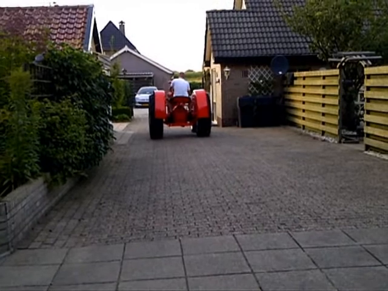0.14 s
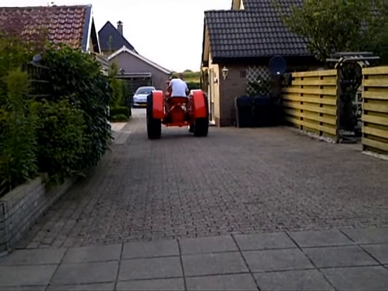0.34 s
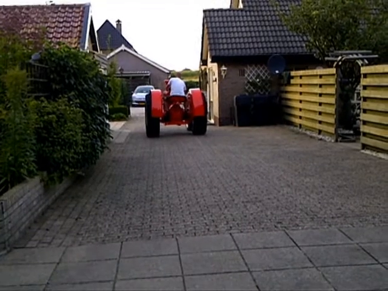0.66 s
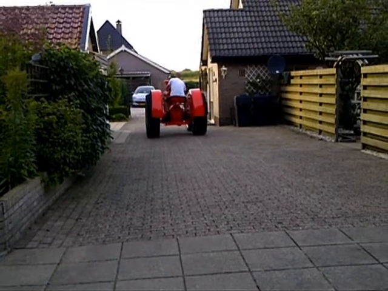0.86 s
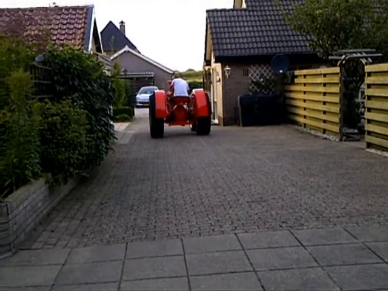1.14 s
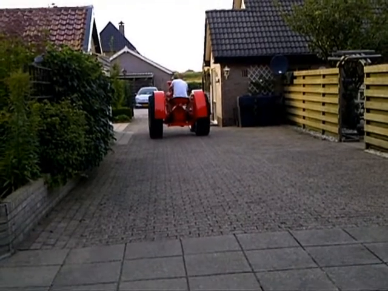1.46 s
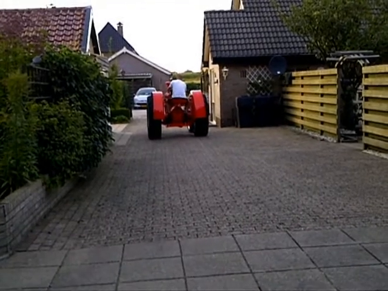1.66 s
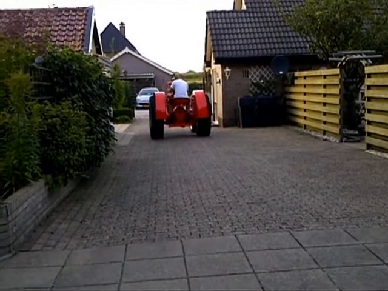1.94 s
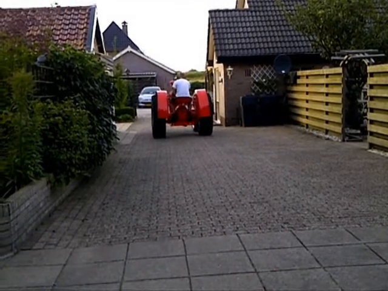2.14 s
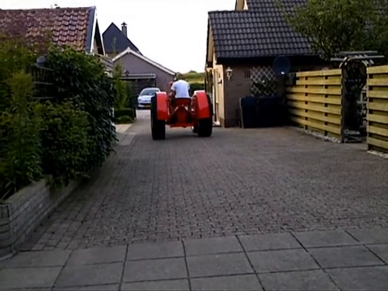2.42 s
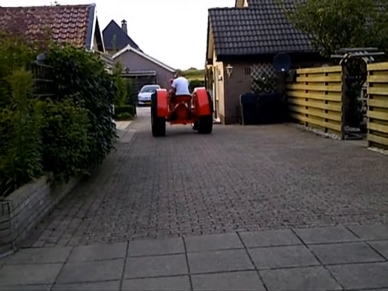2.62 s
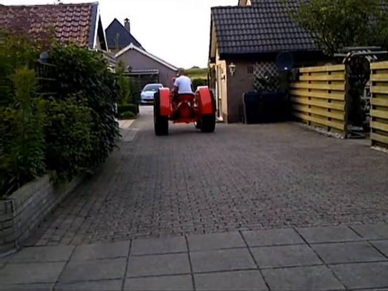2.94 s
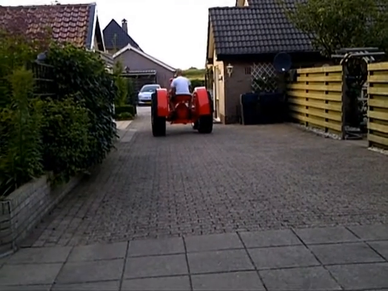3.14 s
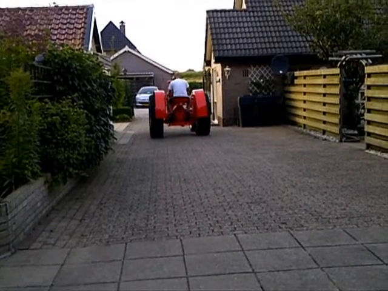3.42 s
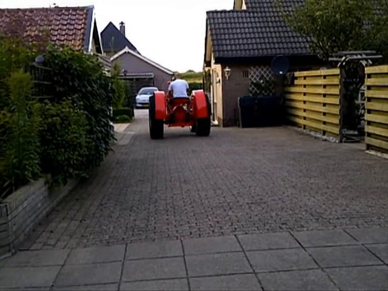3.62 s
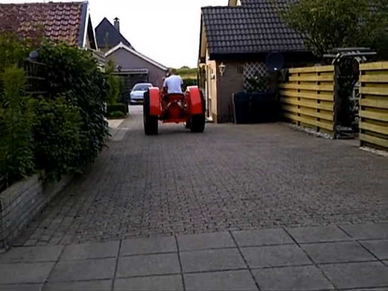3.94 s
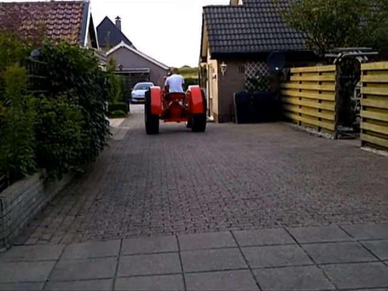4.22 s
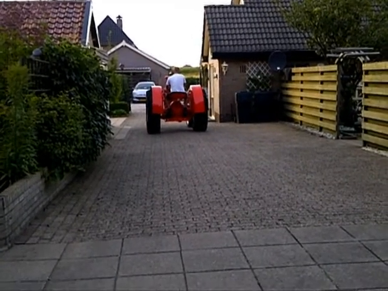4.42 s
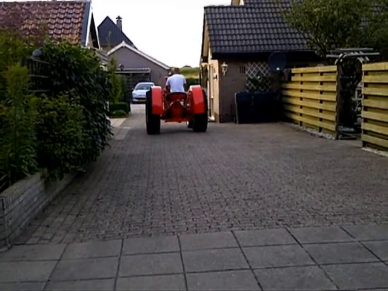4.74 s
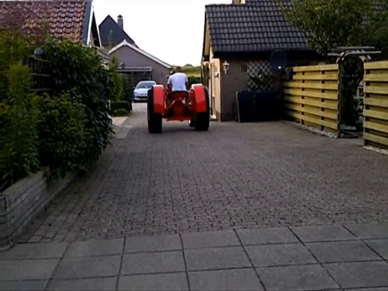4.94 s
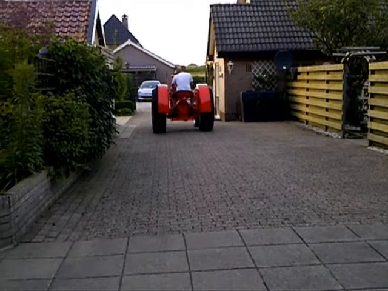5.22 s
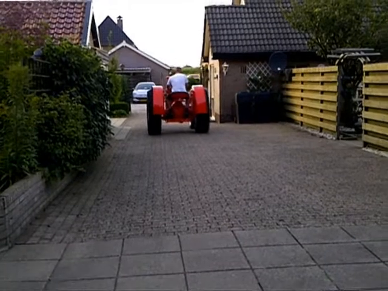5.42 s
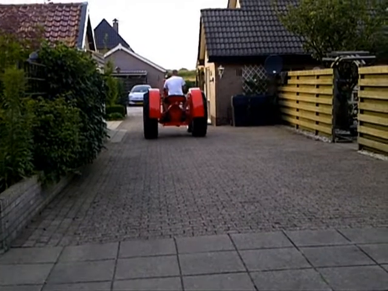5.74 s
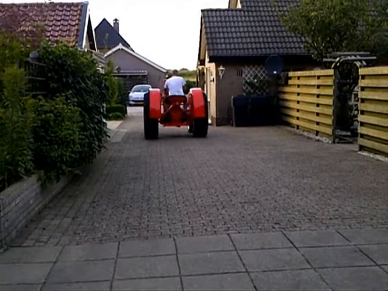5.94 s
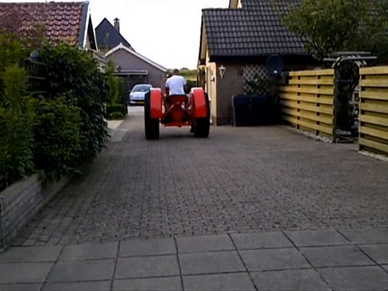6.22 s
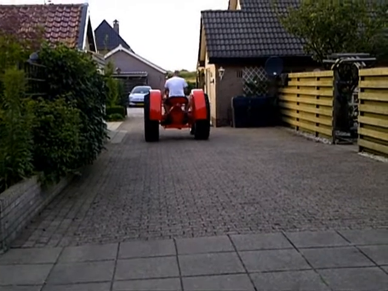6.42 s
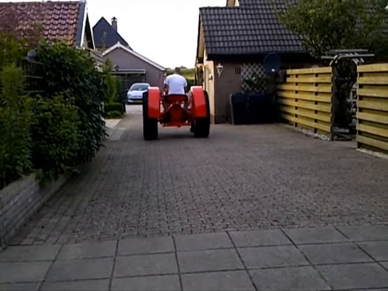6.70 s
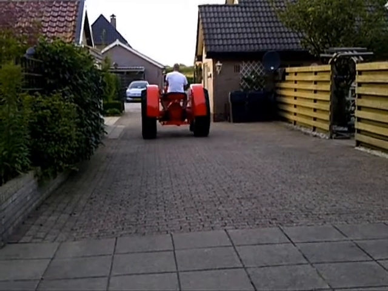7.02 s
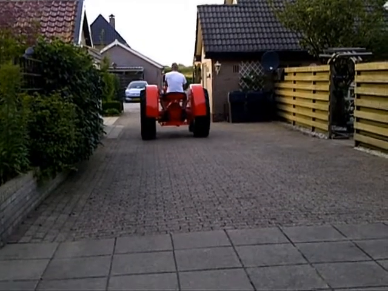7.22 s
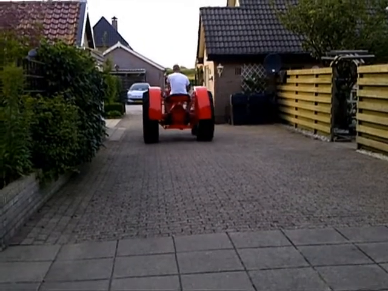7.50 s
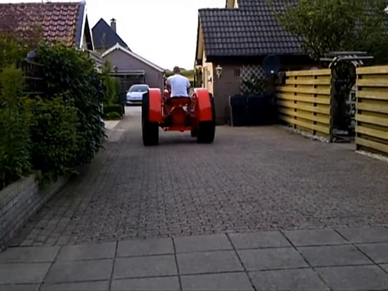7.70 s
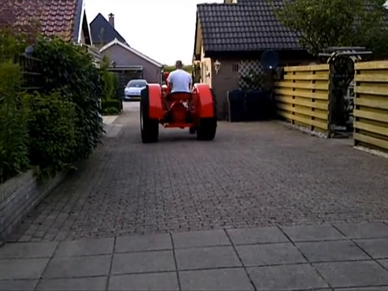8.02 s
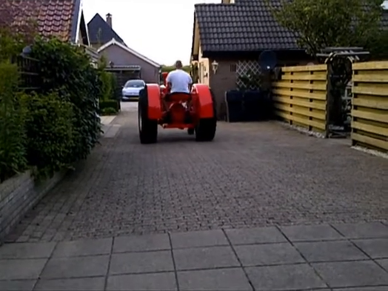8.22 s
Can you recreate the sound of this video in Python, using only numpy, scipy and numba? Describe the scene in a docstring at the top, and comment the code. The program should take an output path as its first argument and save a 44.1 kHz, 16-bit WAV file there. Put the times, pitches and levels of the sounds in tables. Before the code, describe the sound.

An old tractor idles unevenly on a paved driveway, labours down as the clutch bites, then barks loudly and picks up speed.

```python
"""A paved driveway between a shed and a fence, where an old four-cylinder tractor manoeuvres near a small microphone.
It idles with one weak cylinder that now and then catches with a bang, labours as the clutch bites,
barks at a blip of throttle and picks up speed. Each firing is a resonant thump in the stack, a rasp of
noise bursts in the pipe and a knock in the block. Clatter, panel hum, a groan, a drone of engine harmonics
and low outdoor rumble lie around it; paving and walls send the firings back as echoes."""
import sys
import numpy as np
from scipy import signal
from scipy.fft import rfft, irfft
from scipy.io import wavfile
from scipy.ndimage import uniform_filter1d
from numba import njit

SR = 44100
rng = np.random.default_rng(int(sys.argv[2]) if len(sys.argv) > 2 else 0)


def to_wav(sig):
    """Store sig (one row per channel, or 1-D mono) as 16-bit WAV at the path in sys.argv[1].

    Samples outside -1..1 are clipped; the rate is SR.
    """
    pcm = np.clip(np.atleast_2d(sig), -1, 1) * 32767
    pcm = np.round(pcm).astype(np.int16)
    wavfile.write(sys.argv[1], SR, pcm.T)  # frames by channels


N = 368670
TIME = np.arange(N) / SR


def from_db(db):
    """Decibels to gain."""
    return 10 ** (np.asarray(db) / 20)


def rms_one(x):
    """Scale to unit rms."""
    return x / np.sqrt(np.mean(x ** 2) + 1e-20)


def read_curve(rows, times):
    """The value of a two-column curve at the given times."""
    s, value = np.transpose(rows)
    return np.interp(times, s, value)


def noise(spectrum):
    """Unit noise with the given colour, falling away below its lowest point."""
    hz, db = np.transpose(spectrum)
    f = np.maximum(np.fft.rfftfreq(N, 1 / SR), 1)
    gain = from_db(np.interp(np.log(f), np.log(hz), db)) * np.minimum(f / hz[0], 1) ** 2
    return rms_one(irfft(rfft(rng.standard_normal(N)) * gain, N))


def flutter(per_s, depth_db):
    """A quickly changing random gain of unit rms."""
    wander = rms_one(uniform_filter1d(rng.standard_normal(N), max(int(SR / per_s), 1)))
    return rms_one(from_db(depth_db * wander))


@njit
def two_pole(x, feedback, damping):
    """A resonator whose tuning may change at every sample."""
    out = np.zeros(len(x))
    for i in range(2, len(x)):
        out[i] = x[i] - x[i - 2] + feedback[i] * out[i - 1] - damping * out[i - 2] + 1e-18
    return out


def resonate(x, hz, width_hz):
    """One resonance, steady or gliding, with unit gain at its peak."""
    r = np.exp(-np.pi * width_hz / SR)
    feedback = np.broadcast_to(2 * r * np.cos(2 * np.pi * hz / SR), N).copy()
    return (1 - r * r) / 2 * two_pole(x, feedback, r * r)


def resonate_twice(x, hz, width_hz):
    """Two equal resonances in a row: steeper skirts and a softer onset."""
    return resonate(resonate(x, hz, width_hz), hz, width_hz)


def highpass(x, order, hz):
    """Butterworth bass cut."""
    return signal.sosfilt(signal.butter(order, hz, "high", fs=SR, output="sos"), x)


def pulses(times, gains):
    """One click at each time."""
    out = np.zeros(N)
    np.add.at(out, np.clip((times * SR).astype(int), 0, N - 1), gains)
    return out


def puffs(clicks, rise_s, fall_s):
    """Envelope of a puff at every click; 33 unit clicks per second give unit rms."""
    t = TIME[:SR // 8]
    power = ((1 - np.exp(-(t / rise_s) ** 2)) * np.exp(-t / fall_s)) ** 2
    power *= SR / 33 / power.sum()
    # overlapping puffs add in power
    return np.sqrt(np.maximum(signal.fftconvolve(clicks ** 2, power)[:N], 0))


def at_level(x, db):
    """Give a train of firings the mean power of their levels."""
    return rms_one(x) * np.sqrt(np.mean(from_db(db) ** 2))


# engine speed: t/s, firings per s
ENGINE_SPEED = [(0.0, 33.838), (0.636, 32.755), (0.743, 34.092), (0.996, 32.377), (1.605, 33.51),
                (1.81, 32.839), (2.693, 33.837), (3.89, 33.428), (4.606, 30.132), (5.137, 26.144),
                (5.241, 23.906), (6.211, 26.562), (7.164, 27.571), (7.304, 34.122), (7.452, 35.326),
                (7.701, 34.256), (7.962, 35.304), (8.36, 38.637)]


def engine_speed(times):
    """Firing rate in firings per s, which paces the whole engine."""
    return read_curve(ENGINE_SPEED, times)


IDLE_RATE = 31.1   # firings per s; below this the engine lugs


def lugging(times):
    """How far the load drags the engine below IDLE_RATE, in firings per s."""
    return np.maximum(IDLE_RATE - engine_speed(times), 0)


# the driver's throttle, opened as the clutch bites and again to pull away: t/s, opening (0-1)
HELD_THROTTLE = [(0, 0.07), (4.1, 0.06), (4.8, 0.14), (5.35, 0.41), (6.45, 0.47), (7.05, 0.43), (7.6, 0.46),
                 (7.92, 0.48), (8.06, 0.66), (8.36, 0.89)]
# one blip to full throttle
BLIP_START_S, BLIP_ATTACK_S, BLIP_HOLD_S, BLIP_RELEASE_S = 7.146, 0.06, 0.15, 0.16


def throttle(times):
    """Throttle opening 0-1: the driver's slow changes, with the blip on top."""
    held = np.clip(read_curve(HELD_THROTTLE, times), 0, 1)
    corners = np.cumsum([0, BLIP_ATTACK_S, BLIP_HOLD_S, BLIP_RELEASE_S])
    blip = np.interp(times - BLIP_START_S, corners, [0, 1, 1, 0])
    return held + (1 - held) * blip


# the gas heats up above this throttle, and loses this share of full heat per s
COOL_THROTTLE, COOLING_PER_S = 0.99, 0.39


def gas_heat():
    """Heat of the exhaust gas 0-1: it jumps at nearly full throttle and fades steadily."""
    fired = np.clip((throttle(TIME) - COOL_THROTTLE) / (1 - COOL_THROTTLE), 0, 1)
    return np.maximum.accumulate(fired + COOLING_PER_S * TIME) - COOLING_PER_S * TIME


# low outdoor rumble: f/Hz, relative level/dB per Hz
RUMBLE_SPECTRUM = [(20, -16.5), (60, 4.5), (110, -6.5), (200, -28), (600, -30.5)]
RUMBLE_DB, RUMBLE_THROTTLE_DB = -59.5, -53   # steady level, and the level that full throttle adds
BUFFET_AT_S, BUFFET_LENGTH_S, BUFFET_DB = 7.3, 0.0044, -22


def rumble():
    """Low outdoor rumble that swells with the throttle, and one pressure swing at the top of the blip."""
    swing = (TIME - BUFFET_AT_S) / BUFFET_LENGTH_S
    buffet = from_db(BUFFET_DB) * 2 * swing * np.exp(-swing ** 2)
    level = from_db(RUMBLE_DB) + from_db(RUMBLE_THROTTLE_DB) * throttle(TIME) ** 2
    return buffet + level * noise(RUMBLE_SPECTRUM)


# echoes off paving, fence, shed and houses, on paths about 0.4 to 17 m longer than the direct one:
# delay/s, growth of the delay once the tractor rolls (s per s), level/dB before it rolls
WALL_ECHOES = [(.0013, .00005, -21.5), (.00575, 0.00089, -15.5), (0.0129, .0003, -12.5),
               (0.051, 0.00023, -17)]
ROLL_START_S = 4.7
ECHO_LOSS_DB_PER_S = 1.5   # as the tractor comes nearer, its wall echoes fade against the direct sound


def driveway(x, t60_s=0.8, diffuse_db=-11.0, scatter_hz=550):
    """Echoes that slide as the tractor rolls, and a diffuse tail: slats and hedge scatter mostly short waves."""
    t, rolled_s = TIME[:SR // 2], np.maximum(TIME - ROLL_START_S, 0)
    tail = rng.standard_normal(len(t)) * from_db(-60 * t / t60_s) * (1 - np.exp(-t / 0.0032))
    tail = highpass(tail, 2, scatter_hz)
    out = x + from_db(diffuse_db) * signal.fftconvolve(x, tail / np.linalg.norm(tail))[:N]
    for delay_s, growth, db in WALL_ECHOES:
        echo = np.interp(TIME - delay_s - growth * rolled_s, TIME, x, left=0)
        out = out + from_db(db - ECHO_LOSS_DB_PER_S * rolled_s) * echo
    return out


# gears and valves: f/Hz, relative level/dB per Hz
CLATTER_SPECTRUM = [(76, -60), (130, -22), (208, -11), (312, 1), (527, -15), (776, -12), (918, -12),
                    (1110, -17), (1570, -12.5), (2030, -20.5), (2400, -15), (2940, -23.5), (3200, -21.5),
                    (6380, -20), (7300, -26), (9490, -73.5), (16100, -120)]


def clatter(start_db=-38.0, db_per_firing_rate=0.47):
    """Gears and valves as fluttering coloured noise, louder as the engine turns faster."""
    speed = engine_speed(TIME)
    level = from_db(start_db + db_per_firing_rate * (speed - speed[0]))
    return level * noise(CLATTER_SPECTRUM) * flutter(per_s=250, depth_db=1.5)


# sheet-metal panels: f/Hz, width/Hz, level/dB
PANEL_MODES = [(327.7, 10, 7), (358.5, 7, -5.5), (472.6, 6, 0), (579.5, 6, -4.5), (834, 23, -3.5)]
PANEL_DB, PANEL_LUG_DB = -45, 1.7   # level at idle, loss per firing/s of lugging


def panel_hum(steadiness=.75):
    """Bonnet and mudguards, shaken by the engine, sing faintly and almost evenly at their own pitches."""
    shake, hum = rng.standard_normal(N), 0
    for hz, width, db in PANEL_MODES:
        tone = resonate_twice(shake, hz, width)
        swell = np.sqrt(np.maximum(uniform_filter1d(tone ** 2, size=SR // 80), 1e-18))
        hum = hum + from_db(db) * rms_one(tone / swell ** steadiness)   # levels out most of the swelling
    return from_db(PANEL_DB - PANEL_LUG_DB * lugging(TIME)) * rms_one(hum)


# resonances of the drive: f/Hz, width/Hz, level/dB
GROAN_MODES = [(459, 78, -1), (648, 140, -3.5)]
GROAN_AT_S, GROAN_HALF_LENGTH_S, GROAN_DB = 6.63, 0.17, -40.5


def groan():
    """One low groan from the drive as the clutch takes the load: noise in two resonances."""
    slip = rng.standard_normal(N)
    body = sum(from_db(db) * resonate_twice(slip, hz, width) for hz, width, db in GROAN_MODES)
    swell = np.exp(-((TIME - GROAN_AT_S) / GROAN_HALF_LENGTH_S) ** 2)
    return from_db(GROAN_DB) * swell * rms_one(body)


# resonances that pick out engine harmonics as it pulls away: f/Hz, width/Hz, level/dB
DRONE_MODES = [(330, 27, 1), (451, 28, -4.5), (631, 24, 0.5), (721, 24, -3.5), (951, 40, 3), (1032, 46, -5)]
# level at full throttle, loss with the throttle shut, loss per firing/s of lugging
DRONE_DB, DRONE_SHUT_DB, DRONE_LUG_DB = -33.5, 22, 2


def drone(waver_db=3.0):
    """Harmonics of the firing rate rise with speed and swell as they cross each resonance."""
    speed = engine_speed(TIME)
    angle = 2 * np.pi * np.cumsum(speed) / SR
    coarse, coarse_speed, knots = TIME[::SR // 100], speed[::SR // 100], TIME[::SR // 14]
    out = 0
    for order in range(8, 31):
        gain = sum(from_db(db) / (1 + (2 * (order * coarse_speed - hz) / width) ** 2)
                   for hz, width, db in DRONE_MODES)
        waver = np.interp(TIME, knots, from_db(waver_db * rng.standard_normal(len(knots))))
        tone = np.sin(order * angle + 2 * np.pi * rng.random())
        out = out + np.interp(TIME, coarse, gain) * waver * tone
    shut = 1 - read_curve(HELD_THROTTLE, TIME)   # the blip leaves the drone alone
    return from_db(DRONE_DB - DRONE_SHUT_DB * shut - DRONE_LUG_DB * lugging(TIME)) * rms_one(out)


# cylinders in firing order: rasp level/dB, thump level/dB, knock level/dB, thump delay/s
CYLINDERS = [(-2, -0.5, 0.5, .0012), (-6.5, -2.5, -7, 0.0015), (1.5, -4, -7, 0.0012), (-0.5, -1.5, 8, .001)]
# single firings nudged in strength, most of them misfires under load: t/s, level change/dB
STRAY_FIRINGS = [(5.175, -10), (5.98, -10), (6.095, 0), (6.54, 1), (6.875, -1.5), (7.705, -2.5), (7.93, -3)]
# single firings with their own levels and lengths, among them bangs of the lazy cylinder and the strokes
# of the blip: t/s, rasp level/dB, thump level/dB, length as a share of the usual burst
SINGLE_FIRINGS = [(0.038, -41, -32, 1), (0.096, -38, -35.5, 0.51), (0.671, -32, -29.5, .7),
                  (0.731, -42.5, -32, 0.71), (1.278, -33.5, -31.5, .9), (2.002, -36.5, -34.5, .9),
                  (2.601, -34, -28.5, .9), (3.194, -35.5, -30.5, 0.98), (3.252, -37, -34, 0.67),
                  (4.152, -34.5, -32, 0.77), (4.537, -34, -31.5, 0.58), (4.838, -35, -41, 1),
                  (4.875, -37.5, -38.5, .7), (4.948, -34, -32.5, 0.91), (4.982, -34, -38.5, 0.79),
                  (5.256, -35, -34, 1), (5.293, -34.5, -42, .5), (5.337, -35, -41.5, .9),
                  (5.459, -34.5, -46.5, .9), (5.583, -32.5, -33, 0.74), (5.778, -33, -39.5, 1.1),
                  (5.821, -34.5, -37.5, .8), (5.9, -35, -30.5, .9), (5.934, -31, -42.5, .7),
                  (6.055, -37.5, -35, 1), (6.166, -35.5, -44, 1.1), (6.241, -30.5, -42, .8),
                  (6.357, -39, -36.5, 1), (6.429, -33, -45, 0.63), (6.582, -33, -43.5, 1),
                  (6.653, -29.5, -34, 0.93), (6.8, -40, -36.5, 1), (6.981, -30, -44.5, .9),
                  (7.092, -39.5, -35.5, 1), (7.2, -24, -33, .9), (7.235, -21, -29.5, 1.4),
                  (7.264, -19, -37, .8), (7.295, -21, -34.5, .7), (7.324, -22, -36, .6),
                  (7.355, -22.5, -31.5, .7), (7.382, -21, -36, .7), (7.411, -24.5, -32, 0.96),
                  (7.813, -31.5, -32, .9), (8.203, -29, -31.5, 0.7), (8.231, -26.5, -32, .7),
                  (8.311, -26.5, -31, 0.8)]
# single firings with their own knock and crack strength, some of them hard:
# t/s, knock level/dB, crack level/dB
SINGLE_KNOCKS = [(0.097, -39, -39.5), (0.217, -39, -40.5), (0.337, -39.5, -41), (0.458, -38.5, -41.5),
                 (0.58, -39, -39.5), (0.82, -37, -41), (0.945, -35, -41), (1.066, -38, -41.5),
                 (1.187, -35.5, -42.5), (1.427, -40, -43), (1.55, -38, -44.5), (1.668, -36.5, -43.5),
                 (1.79, -40, -41.5), (2.155, -38.5, -41.5), (2.752, -35.5, -42), (2.872, -37.5, -44.5),
                 (3.103, -36.5, -49.5), (3.579, -39.5, -41), (4.182, -37, -40), (4.31, -36.5, -43),
                 (6.325, -41, -46), (7.963, -37, -44.5), (8.09, -30.5, -41), (8.2, -36.5, -45),
                 (8.308, -36, -33)]
FIRST_FIRING = .275   # firing intervals before the first firing
# each part of a firing: level with the throttle shut, change at full throttle, change per firing/s of lugging
RASP_DB, RASP_THROTTLE_DB = -42.0, 18.5
THUMP_DB, THUMP_THROTTLE_DB, THUMP_LUG_DB = -37, 1.6, -2.5
KNOCK_DB, KNOCK_THROTTLE_DB, KNOCK_LUG_DB = -47.5, -1.5, 0.26
EVEN_THROTTLE = 0.17   # every such step of opening halves the differences between cylinders
# the lazy third cylinder: dB lost, more per firing/s of lugging; it fires fully from this throttle up
LAZY_DB, LAZY_LUG_DB, LAZY_CURE_THROTTLE = 6, 1, .55
BURST_LENGTH, BURST_LENGTH_SCATTER = 0.87, .2   # share of the usual burst, and its log scatter
NEXT_KNOCK_DB = -1   # the knock that follows a single firing is softer


def firings(scatter_db=1.54, thump_scatter_db=0.4, knock_scatter_db=1.0, jitter_s=.00012,
            miss_thump_share=0.28, crack_db=-2.5):
    """Time, burst length and part levels of each firing: throttle lifts the rasp most, lugging weakens the thump."""
    count = np.cumsum(engine_speed(TIME)) / SR - FIRST_FIRING
    number = np.arange(int(count[-1]) + 1)
    times = np.interp(number, count, TIME)
    cylinder = number % len(CYLINDERS)
    chance = rng.standard_normal((5, len(times)))
    opening, lug = throttle(times), lugging(times)
    own_rasp, own_thump, own_knock = np.array(CYLINDERS)[cylinder, :3].T * .5 ** (opening / EVEN_THROTTLE)

    miss = -(LAZY_DB + LAZY_LUG_DB * lug) * (cylinder == 2) * (opening < LAZY_CURE_THROTTLE)
    for s, change_db in STRAY_FIRINGS:
        miss[np.argmin(abs(times - s))] += change_db

    rasp = RASP_DB + RASP_THROTTLE_DB * opening + own_rasp + miss + scatter_db * chance[0]
    thump = THUMP_DB + THUMP_THROTTLE_DB * opening + THUMP_LUG_DB * lug + own_thump
    thump += thump_scatter_db * chance[1] + miss_thump_share * miss   # a missed firing still pumps air
    knock = KNOCK_DB + KNOCK_THROTTLE_DB * opening + KNOCK_LUG_DB * lug + own_knock
    knock += miss + knock_scatter_db * chance[2]
    length = BURST_LENGTH * np.exp(BURST_LENGTH_SCATTER * chance[4])

    for s, rasp_db, thump_db, share in SINGLE_FIRINGS:   # this firing takes its own time, strength and length
        k = np.argmin(abs(times - s))
        times[k], rasp[k], thump[k], length[k] = s, rasp_db, thump_db, share
        knock[k + 1] += NEXT_KNOCK_DB
    crack = knock + crack_db
    for s, own_knock_db, own_crack_db in SINGLE_KNOCKS:
        k = np.argmin(abs(times - s))
        knock[k], crack[k] = own_knock_db, own_crack_db
    return times + jitter_s * chance[3], np.clip(length, .3, 2), rasp, thump, knock, crack


# idle bangs that make the stack's rim ping: t/s, level/dB
PINGS = [(0.673, -38), (1.28, -48.5), (2.603, -42), (3.196, -44)]
PING_HZ, PING_WIDTH_HZ = 3650, 200


def pings():
    """The rim of the stack rings briefly on a few idle bangs: puffs of narrow-band noise."""
    s, db = np.transpose(PINGS)
    ring = rms_one(resonate_twice(rng.standard_normal(N), PING_HZ, PING_WIDTH_HZ))
    return ring * puffs(pulses(s, from_db(db)), rise_s=0.0018, fall_s=.007)


# metal on metal: f/Hz, relative level/dB per Hz
CRACK_SPECTRUM = [(700, -10), (1500, 2), (2000, -11.5), (2500, 1), (2900, -9), (3400, -6), (4500, -7.5),
                  (7000, -7.5), (9000, -56.5)]


def cracks(times, db, lag_s=.0012):
    """A dry, bright tick of metal on metal at the start of each knock."""
    envelope = puffs(pulses(times + lag_s, from_db(db)), rise_s=0.00034, fall_s=0.0037)
    return at_level(noise(CRACK_SPECTRUM) * envelope, db)


# engine block: f/Hz, width/Hz, level/dB
BLOCK_MODES = [(810, 30, -3.5), (926, 38, 7), (1060, 230, -8.5), (1244, 13, -1.5), (1555, 88, -8),
               (1810, 7.1, 0.5), (2410, 74, -10), (2666, 62, -2)]


def block_knock(times, db, lead_s=0.0003, mode_scatter_db=0.2, rattle_db=-39.5):
    """Combustion strikes the block, each mode a little differently every time, and loose parts rattle after it."""
    envelope = puffs(pulses(times, from_db(db)), rise_s=0.00084, fall_s=0.0042)
    rattle = from_db(rattle_db) * rng.standard_normal(N) * envelope
    out = 0
    for k, (hz, width, level) in enumerate(BLOCK_MODES):
        strike_db = db + mode_scatter_db * rng.standard_normal(len(times))
        strikes = pulses(times - lead_s, from_db(strike_db))
        sign = (-1) ** k   # neighbouring modes move in opposite phase
        out = out + sign * from_db(level) * resonate(strikes + rattle, hz, width)
    return at_level(out, db)


# gas jet: f/Hz, relative level/dB per Hz
JET_SPECTRUM = [(260, -18.5), (450, -5), (525, -8.5), (680, 0.5), (800, -7.5), (950, -0.5), (1100, -5.5),
                (1300, -5), (1600, -4), (2030, -5.5), (2300, 0.5), (2800, -3.5), (3200, -1), (4100, -6),
                (4750, -9), (5900, -2.5), (7000, -7.5), (7500, -18), (9490, -70), (16100, -120)]


def gas_bursts(db, length, tilt_db=1.08, ripple_db=3.5, ripple_hz=520, alike=0.16,
               rise_s=0.0044, fall_s=0.0052, tail_db=-8.0, tail_s=0.019, size=2048):
    """One burst of jet noise per firing, each with its own length, brightness and patchy colour."""
    t, hz = TIME[:size], np.maximum(np.fft.rfftfreq(size, 1 / SR), 1)
    # part of the wave repeats from firing to firing
    shared, own = rng.standard_normal(size), rng.standard_normal((len(db), size))
    white = np.sqrt(alike) * shared + np.sqrt(1 - alike) * own
    ripple = rng.standard_normal((len(db), len(hz)))
    ripple = rms_one(uniform_filter1d(ripple, max(int(ripple_hz * size / SR), 1), axis=1))
    ripple *= np.minimum(np.sqrt(hz / 3000), 1.2)   # the treble changes most from burst to burst
    tilt = tilt_db * rng.standard_normal((len(db), 1)) * np.log2(np.clip(hz / 2500, .25, 4))
    jet_hz, jet_db = np.transpose(JET_SPECTRUM)
    colour_db = np.interp(np.log(hz), np.log(jet_hz), jet_db) + ripple_db * ripple + tilt
    bursts = irfft(rfft(white) * from_db(colour_db), size)
    stretch = length[:, None]
    rise = 1 - np.exp(-(t / (rise_s * stretch)) ** 2)
    fall = np.exp(-t / (fall_s * stretch)) + from_db(tail_db) * np.exp(-t / tail_s)
    bursts *= rise * fall
    return bursts * (from_db(db) / np.linalg.norm(bursts, axis=1))[:, None]


# pipe overtones stirred by the jet: f/Hz when cool, f/Hz when hot, width/Hz, level/dB when cool, level/dB when hot
PIPE_OVERTONES = [(482, 470, 18, 2, -6.5), (574, 635, 41, -5, -1.5), (701, 728, 25, -3, 5),
                  (906, 1100, 50, 0.5, 3), (1302, 1275, 85, 9.5, 7), (1402, 1400, 30, -1, 1.5),
                  (1567, 1800, 69, -3.5, -2.5), (1830, 1900, 100, -13, -4.5), (2256, 2220, 120, -2, 2),
                  (2482, 2460, 170, 2, 1), (3180, 3087, 150, -6, -1), (3490, 3620, 230, -2, 0.5),
                  (4180, 4200, 260, -9.5, -1)]


def exhaust_rasp(times, db, length, overtones_db=0.0, pulse_db=0.0, pulse_hz=1100, pulse_lag_s=0.001977,
                 mode_scatter_db=2.5, detune=.015):
    """Gas bursts and pressure pulses stir the pipe's overtones, which vary by firing and shift as the gas heats."""
    jet = np.zeros(N)
    for start, burst in zip(np.maximum(times * SR, 0).astype(int), gas_bursts(db, length)):
        jet[start:start + len(burst)] += burst[:max(N - start, 0)]
    jet *= flutter(per_s=3200, depth_db=1.73)
    soften = signal.butter(2, pulse_hz, fs=SR, output="sos")
    push = signal.sosfilt(soften, pulses(times + pulse_lag_s, from_db(db + pulse_db)) + 1e-18)
    heat, pipe = gas_heat(), 0
    # no two charges are equally hot
    wander = 1 + detune * np.interp(TIME, times, rng.standard_normal(len(times)))
    for cool_hz, hot_hz, width, cool_db, hot_db in PIPE_OVERTONES:
        gain = from_db(cool_db) * (1 - heat) + from_db(hot_db) * heat
        gain *= np.interp(TIME, times, from_db(mode_scatter_db * rng.standard_normal(len(times))))
        pitch = (cool_hz + (hot_hz - cool_hz) * heat) * wander
        pipe = pipe + gain * resonate(jet + push, pitch, width)
    return at_level(jet + from_db(overtones_db) * pipe, db)


# fixed resonances of the stack: f/Hz, width/Hz, level/dB
STACK_MODES = [(180.4, 11, -17.5), (327.5, 8, -9), (461.5, 34, -16.5), (690, 170, -24)]
STACK_HZ, STACK_WIDTH_HZ, HOT_STACK_HZ = 306.8, 74, 344.6   # its gliding main resonance


def stack_thump(times, db, turbulence_db=-35.5, jitter_s=.00008, waver_hz=3):
    """Pressure pulses trailed by turbulence boom in the stack; its main pitch wavers and rises with hot gas."""
    chance = rng.standard_normal((2, len(times)))
    delay = np.resize(np.array(CYLINDERS)[:, 3], len(times)) + jitter_s * chance[0]
    clicks = pulses(times + delay, from_db(db))
    turbulence = rng.standard_normal(N) * puffs(clicks, rise_s=0.00048, fall_s=0.019)
    drive = clicks + from_db(turbulence_db) * turbulence
    pitch = STACK_HZ + (HOT_STACK_HZ - STACK_HZ) * gas_heat() + waver_hz * np.interp(TIME, times, chance[1])
    boom = sum(from_db(level) * resonate(drive, hz, width) for hz, width, level in STACK_MODES)
    return at_level(boom + resonate_twice(drive, pitch, STACK_WIDTH_HZ), db)


def scene():
    """The engine's firings between the walls, over drone, hum, groan, clatter and outdoor rumble."""
    times, length, rasp, thump, knock, crack = firings()
    engine = pings() + cracks(times, crack) + block_knock(times, knock)
    engine = engine + exhaust_rasp(times, rasp, length) + stack_thump(times, thump)
    return (rumble() + clatter() + panel_hum() + groan() + drone() + driveway(engine))[None]


def record(dry, bass_hz=150, leak_db=-23.0, cutoff_hz=7150):
    """A small microphone with weak bass, a little of which leaks through, and a steep top cut."""
    thin = highpass(dry, 4, bass_hz) + from_db(leak_db) * dry
    return signal.sosfilt(signal.ellip(8, .5, 70, cutoff_hz, fs=SR, output="sos"), thin)


dry = scene()
out = record(dry)
to_wav(out)
```